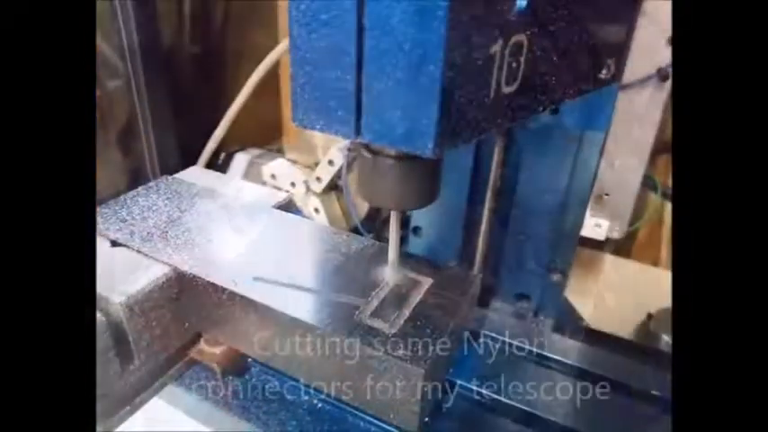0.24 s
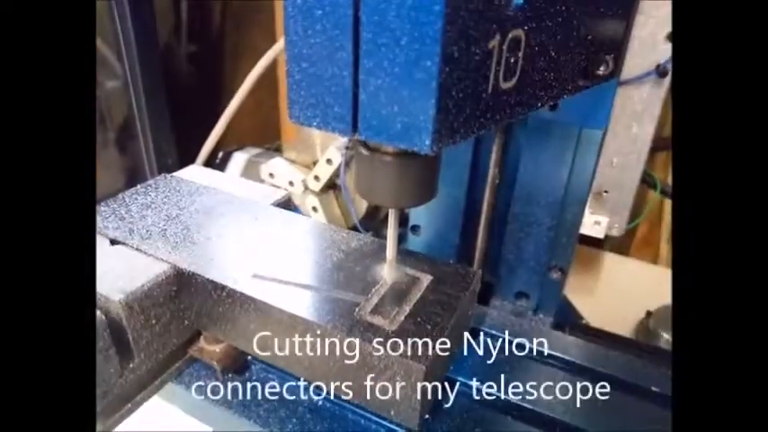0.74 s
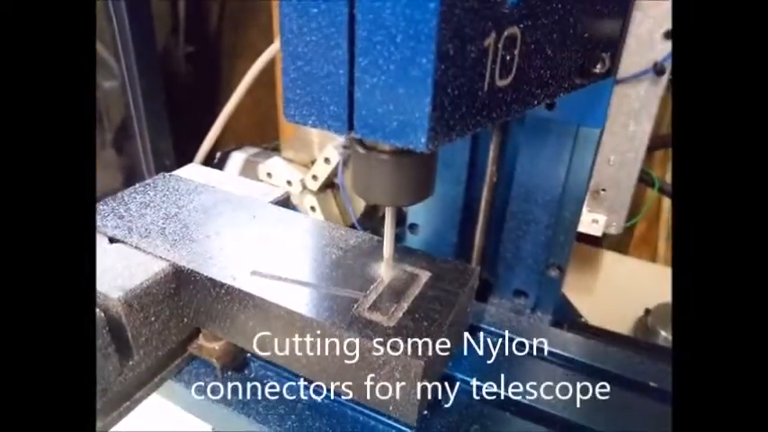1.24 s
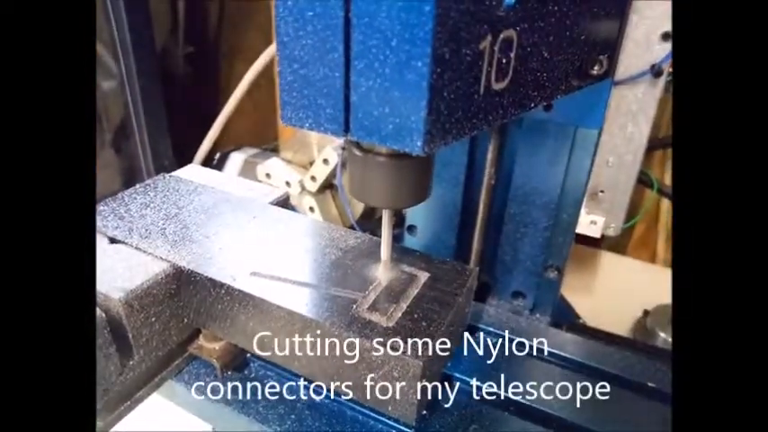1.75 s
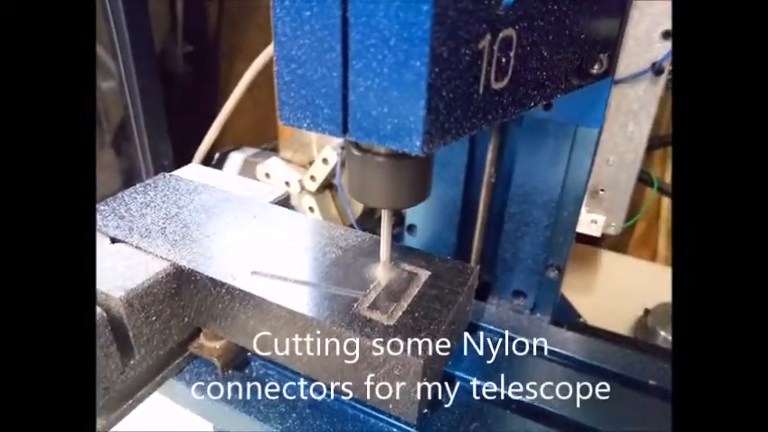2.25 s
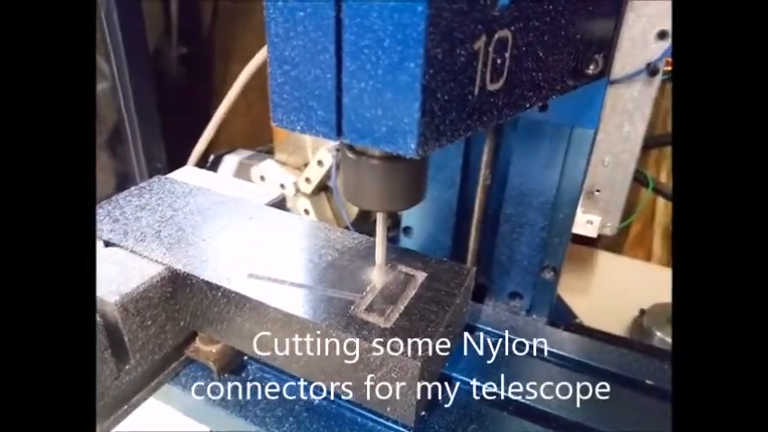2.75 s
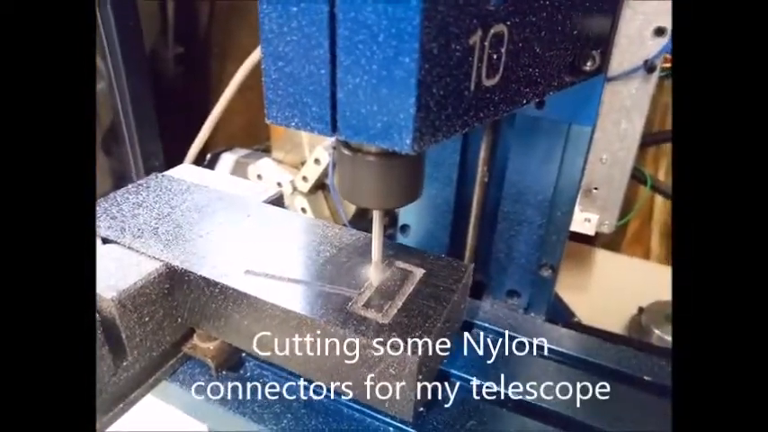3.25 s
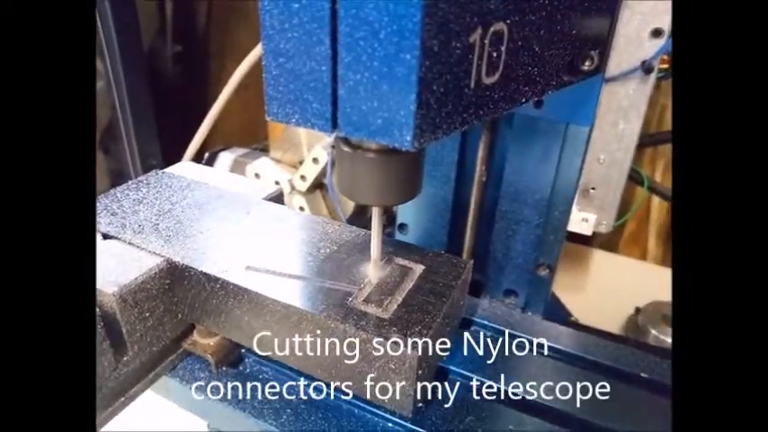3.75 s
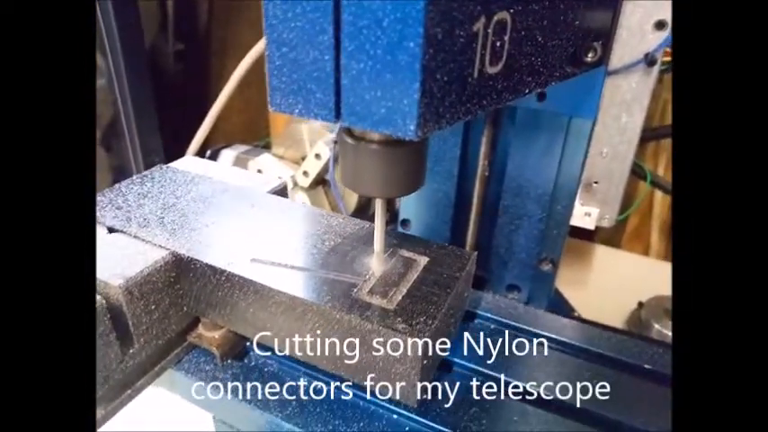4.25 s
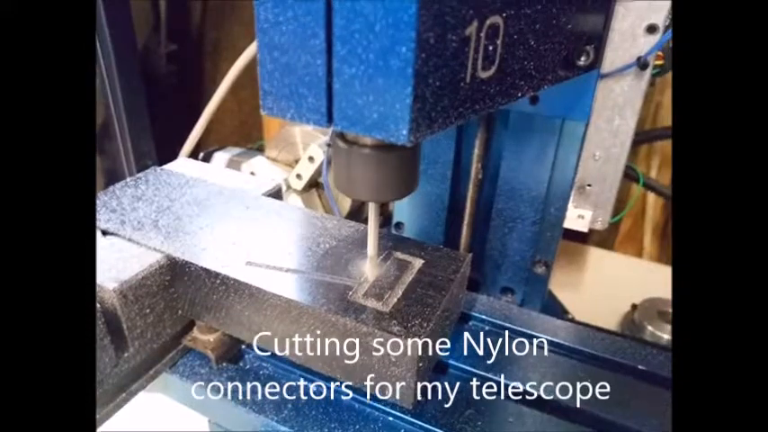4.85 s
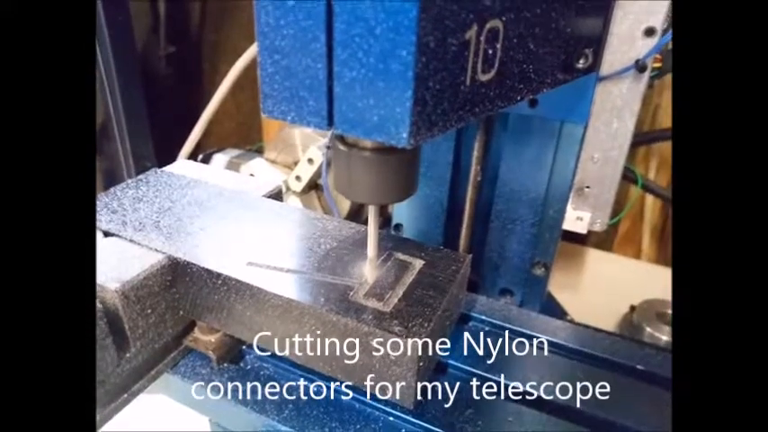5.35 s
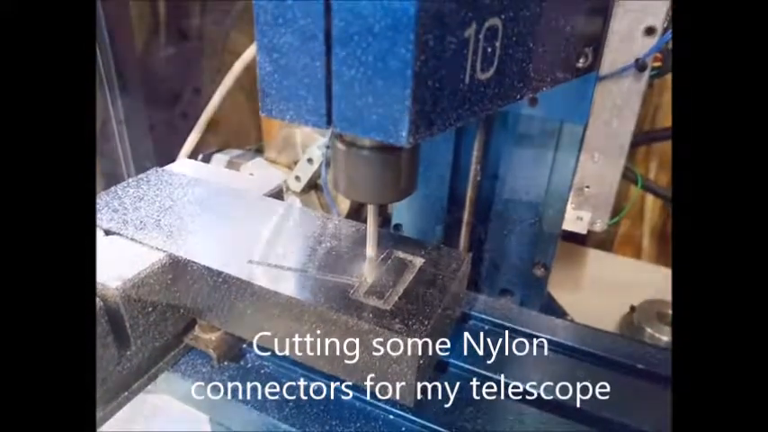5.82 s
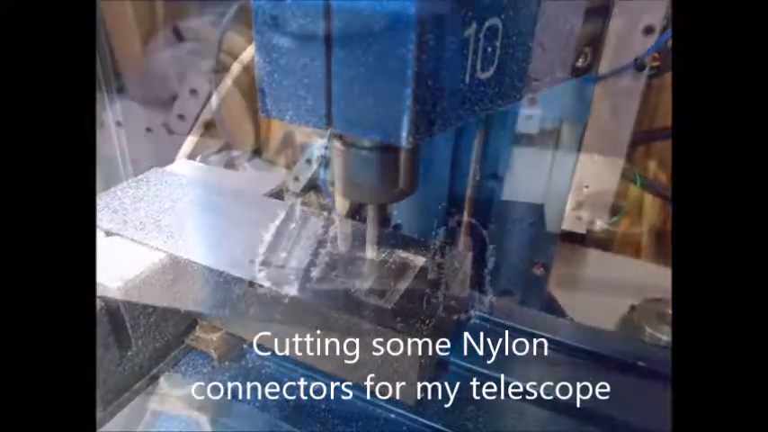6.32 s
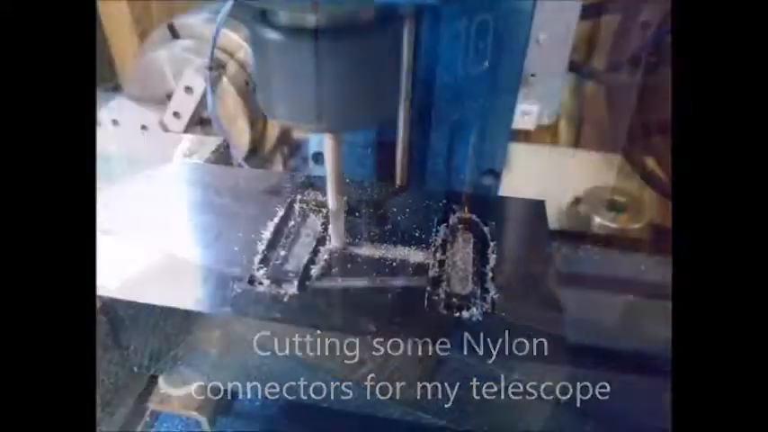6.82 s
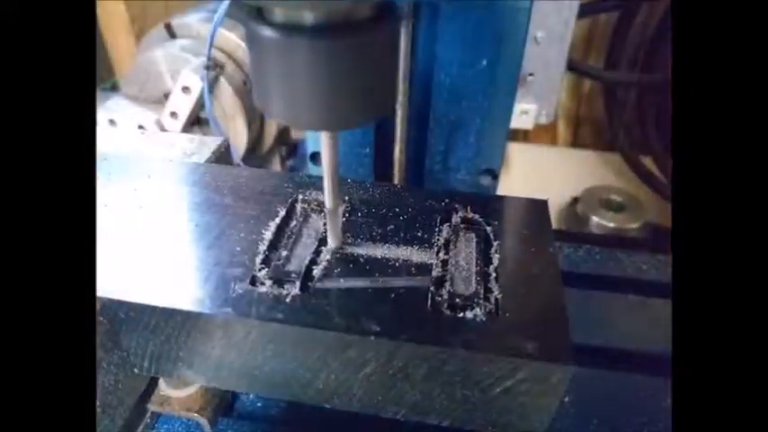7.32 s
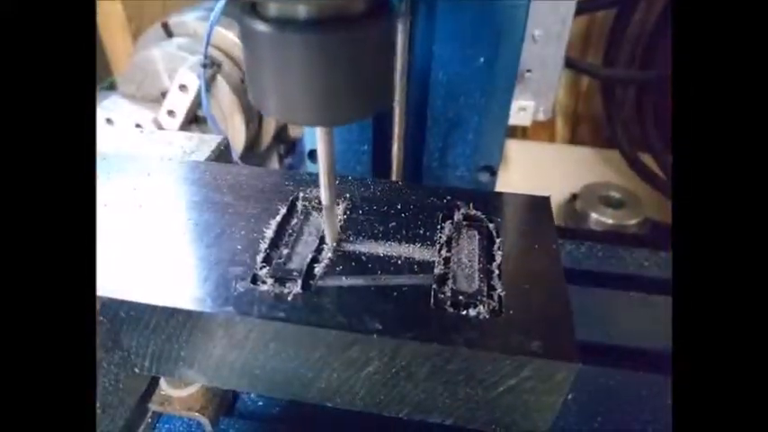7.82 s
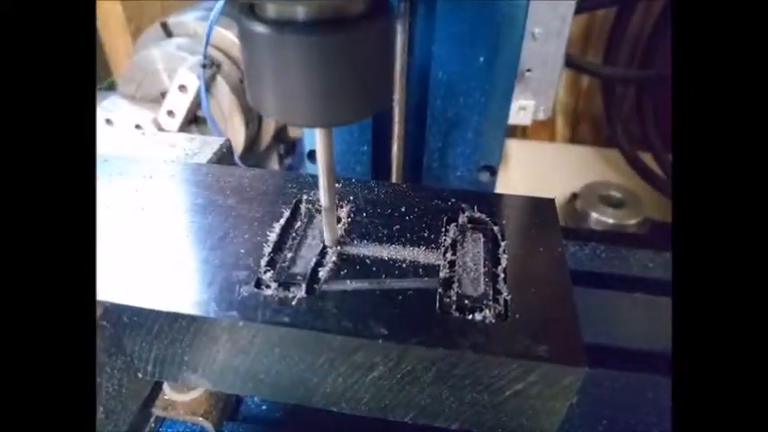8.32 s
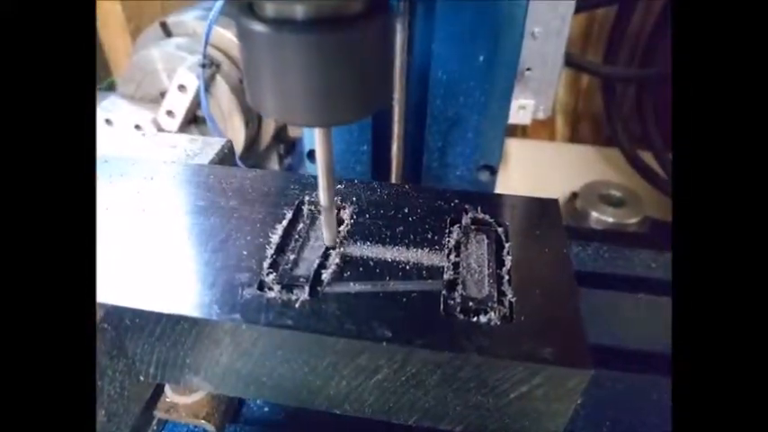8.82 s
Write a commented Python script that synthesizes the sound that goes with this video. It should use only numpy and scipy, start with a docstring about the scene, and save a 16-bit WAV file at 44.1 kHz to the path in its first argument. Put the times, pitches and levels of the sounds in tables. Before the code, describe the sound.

Close stereo pickup of a benchtop milling machine: motor hum, airy cutter noise and a piercing, buzzing chatter whine, restarting its rising slide several times a second. Pitch dips slightly as the cutter loads every couple of seconds, with brief tiny squeaks. Near six seconds a second, slightly faster cut blends in and the whine slips flatter, then abruptly vanishes. Only a steadier whirr and left-leaning hiss continue.

```python
"""A belt-driven spindle whines loudly from the start, throbbing once a turn and sliding upward on each lap of the belt.
This is a benchtop mill cutting nylon, heard first in a wide view, over hum, cutter rasp and two early soft knocks.
Each round of the pocket loads the cutter, and motor speed and whine pitch sag together.
A close view fades in beneath, a little faster and without the whine: a whirr with a bright hiss on the left.
Tones are summed from rotating phases, rasp and hiss are filtered noise, and the wide view ends abruptly."""
import sys
import numpy as np
from scipy import signal
from scipy.fft import rfft, irfft
from scipy.io import wavfile
from scipy.ndimage import uniform_filter1d

SR = 44100
rng = np.random.default_rng(int(sys.argv[2]) if len(sys.argv) > 2 else 0)


def int16_out(signal):
    """Quantize to a 16-bit WAV file."""
    q = np.round(np.clip(np.atleast_2d(signal).T, -1, 1) * 32767)
    wavfile.write(sys.argv[1], SR, q.astype(np.int16))


N = 399987
TIME = np.arange(N) / SR  # s
BINS = np.fft.rfftfreq(N, 1 / SR)  # Hz

# Levels hold before the fader of their view, except squeaks and knocks, which no fader touches.
# Mean motor speed in the close view. Each row: time in seconds, speed in Hz.
CLOSE_MOTOR = [(6.9, 238.2), (8, 238.7)]
# Modes that carry the whine and its octave, before and after the whine slips flat.
# Each row: frequency in Hz, nominal width in Hz, relative left level in dB, relative right level in dB.
WHINE_MODES = [(1938, 45, -2, 3.5), (1972, 54, -7, 4), (2116, 58, 1, -20), (2130, 380, -17, -26),
               (2168, 69, -1.5, -7.5), (2340, 34, 3, 1), (2380, 19, 9, 8)]
OCTAVE_MODES = [(3830, 66, 11, 6), (3895, 37, 3.5, -7), (4160, 66, -4, 6.5), (4396, 82, 7.5, 6.5),
                (4614, 43, -3, 6.5), (4615, 73, 2, 9)]
FLAT_MODES = [(1725, 39, 16.5, 9), (1820, 25, 7, -3), (1980, 55, -1, 4.5), (2150, 40, -12, -13),
              (2164, 45, 0.5, -6), (2330, 37, -1, -9)]
FLAT_OCTAVE_MODES = [(3980, 110, 0, -1), (4150, 46, 0.0071, 0)]
# Rush of cutter, fan and bearings. Each row: frequency in Hz, left dB per Hz, right dB per Hz.
WIDE_RUSH = [(40, -86, -88.5), (130, -80.5, -81.5), (495, -78, -79.5), (627, -68.5, -71.5),
             (746, -70.5, -70), (1014, -66.5, -63.5), (1320, -64.5, -64), (1670, -66, -69),
             (2030, -58, -59.5), (2940, -67, -67), (4100, -63.5, -61), (4950, -69, -67), (6670, -67, -68),
             (7960, -84, -79.5), (11520, -70, -82.5), (13300, -78, -110), (15150, -73.5, -77.5)]
CLOSE_RUSH = [(40, -92, -101), (140, -80.5, -75), (437, -74.5, -95), (606, -72.5, -91), (1144, -63.5, -61),
              (1390, -70.5, -66.5), (1640, -64.5, -76.5), (2520, -64, -74.5), (2980, -71, -70.5),
              (3170, -72.5, -74), (3560, -70.5, -73), (3830, -73, -73), (5130, -73, -80.5),
              (7200, -70, -86), (8200, -77.5, -90), (10700, -70.5, -93), (11900, -70, -99),
              (13700, -74.5, -101.5), (15100, -67.5, -90.6)]
# Narrow peaks of tone and hiss, whose power adds to the rush.
# Each row: frequency in Hz, nominal width in Hz, left dB per Hz, right dB per Hz.
WIDE_PEAKS = [(315, 43, -78, -72), (586, 35, -67, -70), (692, 20, -67.5, -63.5), (826, 20, -80, -64.5),
              (1087, 69, -62.5, -58), (1163, 24, -63, -60), (1258, 23, -63, -62), (1369, 48, -62, -57),
              (1510, 46, -67.5, -56.5), (1620, 20, -62, -63), (1694, 24, -59.5, -57),
              (2500, 39, -61.5, -64.5), (2750, 23, -62, -63), (3200, 55, -69, -64), (4930, 80, -67, -64)]
CLOSE_PEAKS = [(332, 14, -90, -68), (582, 78, -67.5, -66.5), (699, 29, -68, -57.5), (830, 18, -76, -74),
               (888, 15, -72, -62), (1060, 60, -63, -73), (1260, 42, -58.5, -69), (1475, 70, -60.5, -77),
               (1596, 53, -61.5, -68), (1770, 69, -63.5, -61), (1916, 50, -59.5, -62), (2160, 37, -76, -70),
               (2270, 70, -75, -64), (2855, 110, -65.5, -71), (3347, 33, -59, -71), (4260, 70, -72, -74),
               (5700, 90, -73, -78), (6720, 140, -70.5, -80), (14700, 230, -68.5, -90),
               (15080, 250, -64.5, -90)]
# Hum at 1, 2 and 3 times the spindle's speed, then 1, 3 and 6 times the motor's.
# Each row: left level in dB, right level in dB.
WIDE_HUM = [(-47, -46.5), (-62, -68), (-64, -48), (-44, -46), (-51, -52), (-43.5, -41.5)]
CLOSE_HUM = [(-53, -54), (-73, -69), (-88, -55), (-45.5, -50), (-62, -62), (-52, -56)]
# Likeness of the rush at the two ears. Each row: frequency in Hz, correlation from -1 to 1.
LIKENESS = [(40, 0.52), (130, 0.74), (450, 0.6), (750, 0.84), (1050, -0.33), (1500, -0.53), (2000, 0.27),
            (4000, -0.055), (15000, 0.0088)]
# Brief clean notes of the whine. Each row: centre time in seconds, peak level in dB, pitch in Hz.
SQUEAKS = [(2.073, -19, 1934), (2.2, -20, 1940), (4.25, -22.5, 1910), (4.82, -21, 1975), (4.95, -23, 1972),
           (5.07, -23, 1980)]
# Soft knocks on the machine. Each row: centre time in seconds, peak level in dB, centre frequency in Hz.
KNOCKS = [(0.319, -23, 265), (0.366, -23.5, 260)]
# Level of the whine's octave. Each row: time in seconds, level in dB.
OCTAVE_LEVEL = [(0, -34.5), (0.4, -34), (0.55, -38), (0.75, -32), (1.1, -34.5), (2.1, -34.5), (2.3, -33),
                (2.7, -34), (2.9, -35.5), (3.5, -36), (3.7, -33), (4.5, -35), (5, -34), (5.35, -31.5),
                (5.75, -36.5), (6.12, -32.5), (6.28, -42), (7.1, -43)]
# One slide of the whine, rising in two surges, begun anew on every lap of the belt.
# Each row: age in laps, pitch offset in Hz, burst delay in radians, whine throb depth,
# relative whine level in dB, octave throb depth, relative octave level in dB.
SLIDE = [(0, -40, -1.2, 1.5, -21, 1.5, -22), (.17, -26, -.8, 1.7, -1.5, 1.5, 0),
         (.38, 0, -0.1, 1.4, 0, 1.6, 3.5), (.56, -17, .1, 1.2, -1.5, 1, 1.5),
         (.82, 14, 0.26, 2.17, 2, 0.96, 1.5), (1.02, 22, 0.13, 1.9, -0.5, 1, -3),
         (1.2, 8, 0.41, 1.9, -15, 1, -18), (1.45, 8, .6, 1.4, -45, 1, -45)]
# Overtones of the cutter's bite. Each row: multiple of the spindle's speed, left level in dB, right level in dB.
BITE_ORDERS = [(7, -50.5, -52.5), (8, -56, -46.5), (9, -55, -50), (10, -56, -51), (11, -51, -50.5),
               (15, -53, -56), (17, -47, -50.5), (18, -45.5, -54)]

# Belt drive: motor turns per spindle turn, and spindle turns per lap of the belt
PULLEY_RATIO, TURNS_PER_LAP = 2.289, 13.68
LAP_START_S = 3.0  # one lap of the belt starts here
SLIDE_START = 0.2204  # share of the lap at which a slide begins
# The cutter circles a pocket: each round the load builds up, peaks, and is quickly shed
ROUND_S, HEAVIEST_S, SHED_S, BUILD_S = 1.76, 1.58, .34, .85
# Wide view: motor speed when running light, and its sag under full load
MOTOR_HZ, MOTOR_SAG_HZ = 231.9, 3.7
# The whine goes flat under load; it also grows a little, and falls away in the dissolve
WHINE_HZ, WHINE_SAG_HZ = 2110.8, 29.56
WHINE_DB, WHINE_LOAD_DB, WHINE_FALL_DB_PER_S = -23.5, 1.5, 3.5
WHINE_HELD_BACK_DB = 0.5  # the whine gains less than the rest in the loud opening
WHINE_ROUGH, OCTAVE_ROUGH = .13, .2  # share of random modulation in each tone
SELF_LIMIT = .27  # share of a flare, in dB, that the chatter holds down
WHINE_LAG, OCTAVE_LAG = 1.55, 0.66  # radians by which the right ear lags
# Late in the dissolve the whine slips flat, then comes in patches
SLIP_S, SLIP_LENGTH_S, SLIP_HZ, FLAT_PATCHY_DB = 6.22, 0.093, 28.05, 1.4
# The wide view opens loud, holds, settles, sinks from the dissolve on, and stops dead
OPENING_DB, OPENING_HOLD_S, SETTLE_S = 4.5, 0.46, 0.51
DISSOLVE_S, SINK_S, SINK_DB, WIDE_END = 5.58, 0.81, 1.5, 7.095
# The close view fades in, stays raised while both views sound, then settles
CLOSE_START_S, CLOSE_RISE_S, OVERLAP_DB, CLOSE_SETTLE_S = 5.5, 0.35, 2.5, 0.34
EDGE_HZ = 15520  # upper limit of the band


def amp(db):
    """Level law: decibels become an amplitude ratio."""
    return 10 ** (np.asarray(db) / 20)


def curve(rows, axis=1):
    """Linear interpolation in time gives one column of a table at every sample."""
    rows = np.asarray(rows)
    return np.interp(TIME, rows[:, 0], rows[:, axis])


def spectrum(rows, axis=1):
    """Interpolation along log frequency gives one column of a table at every bin."""
    rows = np.asarray(rows)
    return np.interp(np.log(BINS + 1), np.log(rows[:, 0]), rows[:, axis])


def ramp(start, length):
    """Linear transition: rises evenly from 0 to 1."""
    return np.clip((TIME - start) / length, 0, 1)


def wander(rate_hz):
    """Low-passed noise: slow chance of unit size, up to about the given rate."""
    x = irfft(rfft(rng.standard_normal(N)) / np.sqrt(1 + (BINS / rate_hz) ** 4), N)
    return x / x.std()


def angle(hz):
    """Phase is the running integral of frequency."""
    return 2 * np.pi * np.cumsum(hz * np.ones(N)) / SR


def laps(spindle):
    """Belt kinematics: a running count of laps follows from the spindle's angle."""
    start = np.interp(LAP_START_S, TIME, spindle)
    return (spindle - start) / (2 * np.pi * TURNS_PER_LAP)


def spectral_peaks(rows):
    """Peaked power spectrum: each row adds power around its frequency, at its own level to either ear."""
    power = 0
    for hz, width, *db in rows:
        detuning = (BINS - hz) / (0.64 * width)
        power = power + amp(db)[:, None] ** 2 / (1 + detuning ** 2) ** 2
    return power


def cutting_load():
    """Periodic loading: the cutter's load, 0-1, builds up and is shed on every round of the pocket."""
    since = (TIME - HEAVIEST_S) % ROUND_S
    shed = 1 - since / SHED_S
    build = 1 - (ROUND_S - since) / BUILD_S
    return np.clip(np.maximum(shed, build), 0, 1)


def hum(motor_hz, levels, waver):
    """Rotating unbalance: spindle and motor radiate tones at multiples of their speeds."""
    motor = angle(motor_hz)
    spindle = motor / PULLEY_RATIO
    orders = (spindle, 2 * spindle, 3 * spindle, motor, 3 * motor, 6 * motor)
    lead = np.array([[.17], [-.17]])  # radians: the left ear is nearer
    return sum(amp(db)[:, None] * np.cos(turn + lead) * (1 + waver * wander(11.4))
               for db, turn in zip(levels, orders))


def rush(shape, peaks, spindle, throb, flutter):
    """Filtered noise: treble pulses once a turn; the mids swell with each belt lap and flutter by chance."""
    left, other = rfft(rng.standard_normal((2, N))) * np.sqrt(SR / 2)
    same = np.clip(spectrum(LIKENESS), -1, 1)
    right = same * left + np.sqrt(1 - same ** 2) * other
    power = amp([spectrum(shape, axis=1), spectrum(shape, axis=2)]) ** 2 + spectral_peaks(peaks)
    noise = np.array([left, right]) * np.sqrt(power)
    treble = irfft(noise * BINS ** 4 / (BINS ** 4 + 3300 ** 4), N)
    mids = irfft(noise * np.exp(-(np.log((BINS + 1) / 3200) / 3.2) ** 2), N)
    lap_swell = flutter * (3.14 * wander(14.6) - np.cos(2 * np.pi * laps(spindle)))
    return irfft(noise, N) + throb * np.cos(spindle) * treble + lap_swell * mids


def knocks():
    """Heavily damped impact: each knock is one dull push with no ring."""
    out = np.zeros(N)
    for s, db, hz in KNOCKS:
        u = (np.pi * hz * (TIME - s)) ** 2
        out -= amp(db) * (1 - 2 * u) * np.exp(-u)
    return out


def bite(spindle, waver):
    """Periodic forcing: a cutter that bites once a turn gives a buzz of wavering overtones."""
    out = 0
    for k, *db in BITE_ORDERS:
        steady = (1 + waver * wander(19)) * np.cos(k * spindle)
        loose = waver * np.array([wander(13), wander(21)]) * np.sin(k * spindle)  # apart at each ear
        out = out + amp(db)[:, None] * (steady + loose)
    return out


def squeaks(length):
    """Pure tones under bell-shaped envelopes: brief clean notes near the whine's lowest modes."""
    return sum(amp(db) * np.exp(-((TIME - s) / length) ** 2) * np.sin(2 * np.pi * hz * TIME)
               for s, db, hz in SQUEAKS)


def chatter(spindle, age, pitch_hz, drift_hz, jitter_hz, chirp, uneven, stagger, surge_db):
    """Self-excited vibration: tone and octave burst once a turn, rising in two surges, bursts mostly later with age."""
    ages, *columns = np.transpose(SLIDE)
    offset_hz, delay, throb, db, octave_throb, octave_db = [np.interp(age, ages, column) for column in columns]
    turn = spindle - delay + stagger * wander(35)
    carrier = angle(pitch_hz + offset_hz + drift_hz * wander(14) + jitter_hz * wander(60.5))
    # phase modulation once a turn bends the pitch within each burst
    carrier = carrier - chirp * (1 + 0.31 * wander(36)) * np.cos(turn + 0.39 + 0.46 * wander(16))
    grip = 1 + uneven * wander(30)  # no two turns bite quite alike
    tones = []
    for k, depth, level_db, rough in ((1, throb, db, WHINE_ROUGH), (2, octave_throb, octave_db, OCTAVE_ROUGH)):
        roughness = wander(260) * np.cos(k * carrier) + wander(140) * np.sin(k * carrier)
        tone = np.cos(k * carrier) + rough * roughness
        # the Bessel function keeps the mean power alike at any depth
        burst = np.exp(depth * grip * np.cos(turn)) / np.sqrt(np.i0(2 * depth * grip))
        tones.append(amp(level_db + surge_db * wander(6.2)) * tone * burst)
    return np.array(tones)


def ring(drive, modes, lag):
    """Modal response with self-limiting: modes colour a tone for either ear and flares are held down."""
    ear_lag = np.exp(-1j * np.array([[0], [lag]]))
    out = irfft(rfft(drive) * np.sqrt(spectral_peaks(modes)) * ear_lag, N)
    power = abs(uniform_filter1d(uniform_filter1d(out ** 2, size=1310), size=880)) + 1e-12
    flare = power / power.mean(axis=1, keepdims=True)
    out = out / flare ** (SELF_LIMIT / 2)
    return out / out.std()


def whine(spindle, load):
    """Chatter driving modes: rising slides, one a lap, each overlapping the next, ring the machine."""
    flat = ramp(SLIP_S, SLIP_LENGTH_S)
    pitch_hz = WHINE_HZ - WHINE_SAG_HZ * load - SLIP_HZ * flat
    tone, octave = sum(chatter(spindle, (laps(spindle) - SLIDE_START + k) % 2, pitch_hz, drift_hz=7, jitter_hz=12,
                               chirp=0.89, uneven=0.25, stagger=0.2, surge_db=0.5) for k in range(2))
    before, after = np.sqrt(1 - flat), np.sqrt(flat)  # equal-power crossfade
    patches = amp(FLAT_PATCHY_DB * wander(5.7))
    tone = before * ring(tone, WHINE_MODES, WHINE_LAG) + after * patches * ring(tone, FLAT_MODES, WHINE_LAG)
    octave = before * ring(octave, OCTAVE_MODES, OCTAVE_LAG) + after * ring(octave, FLAT_OCTAVE_MODES, OCTAVE_LAG)
    whine_db = WHINE_DB + WHINE_LOAD_DB * load
    whine_db = whine_db - WHINE_FALL_DB_PER_S * np.maximum(TIME - DISSOLVE_S, 0)
    whine_db = whine_db - WHINE_HELD_BACK_DB * (1 - ramp(OPENING_HOLD_S, SETTLE_S))
    return amp(whine_db) * tone + amp(curve(OCTAVE_LEVEL)) * octave


def close_view():
    """Superposition of rush and hum: the faster cut without the whine fades in."""
    motor_hz = curve(CLOSE_MOTOR) + .5 * wander(1.47)
    spindle = angle(motor_hz / PULLEY_RATIO)
    body = rush(CLOSE_RUSH, CLOSE_PEAKS, spindle, throb=0.067, flutter=0.022)
    body = body + hum(motor_hz, CLOSE_HUM, waver=0.22)
    raised = np.exp(-np.maximum(TIME - WIDE_END, 0) / CLOSE_SETTLE_S)
    return ramp(CLOSE_START_S, CLOSE_RISE_S) * amp(OVERLAP_DB * raised) * body


def wide_view():
    """Load-coupled speed: motor and whine of the cut sag together; it ends within a few milliseconds."""
    load = cutting_load()
    motor_hz = MOTOR_HZ - MOTOR_SAG_HZ * load
    spindle = angle(motor_hz / PULLEY_RATIO)
    body = rush(WIDE_RUSH, WIDE_PEAKS, spindle, throb=0.067, flutter=0.027)
    body = body + hum(motor_hz, WIDE_HUM, waver=0.21)
    tone = whine(spindle, load) + bite(spindle, waver=0.33)
    opening_db = OPENING_DB * (1 - ramp(OPENING_HOLD_S, SETTLE_S))
    fader = amp(opening_db - SINK_DB * ramp(DISSOLVE_S, SINK_S))
    stop = np.clip((WIDE_END - TIME) / 0.0053, 0, 1)
    return (fader * (body + tone) + squeaks(length=0.0125)) * stop


def scene():
    """Superposition: both views of the mill and the knocks add."""
    return wide_view() + close_view() + knocks()


def record(dry):
    """Band limiting: a steep linear-phase low-pass removes the highest treble."""
    lowpass = signal.firwin(801, EDGE_HZ, window=("kaiser", 9), fs=SR)
    return signal.oaconvolve(dry, lowpass[None], "same")


dry = scene()
out = record(dry)
int16_out(out)
```